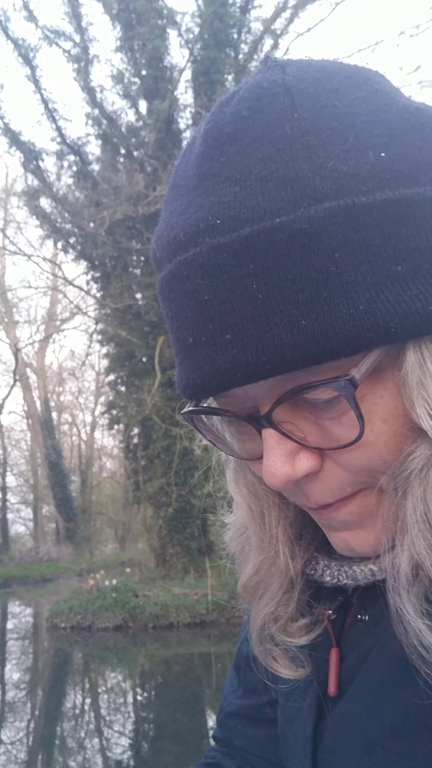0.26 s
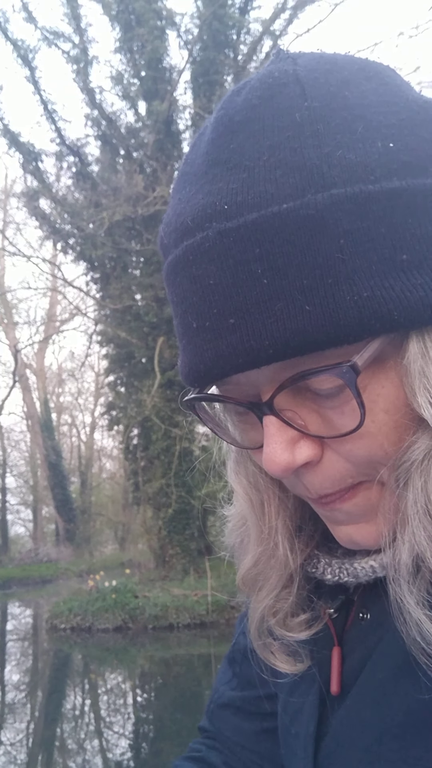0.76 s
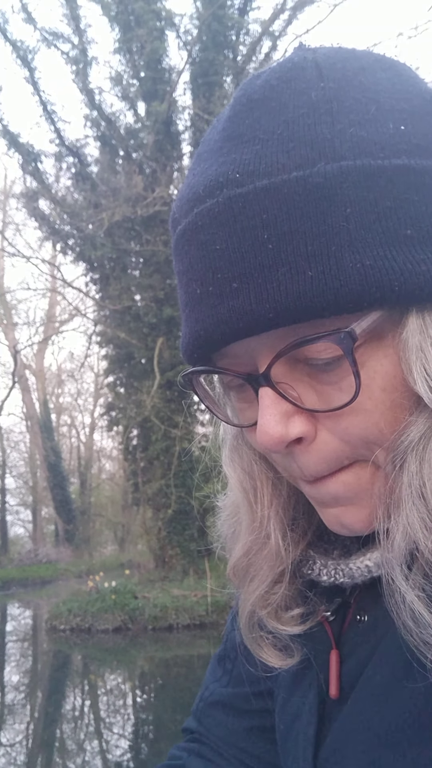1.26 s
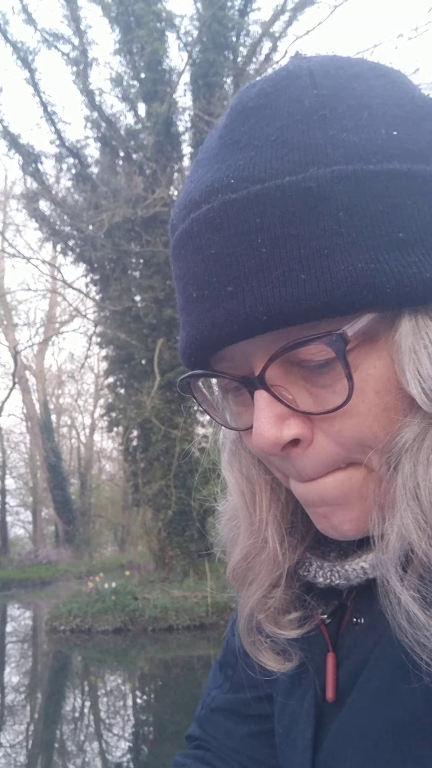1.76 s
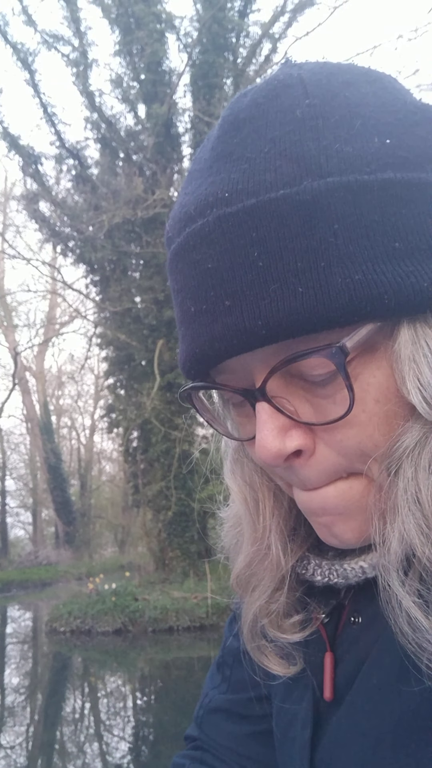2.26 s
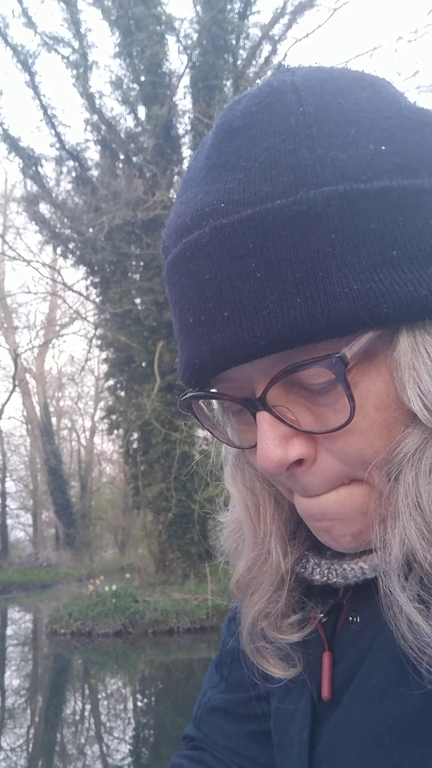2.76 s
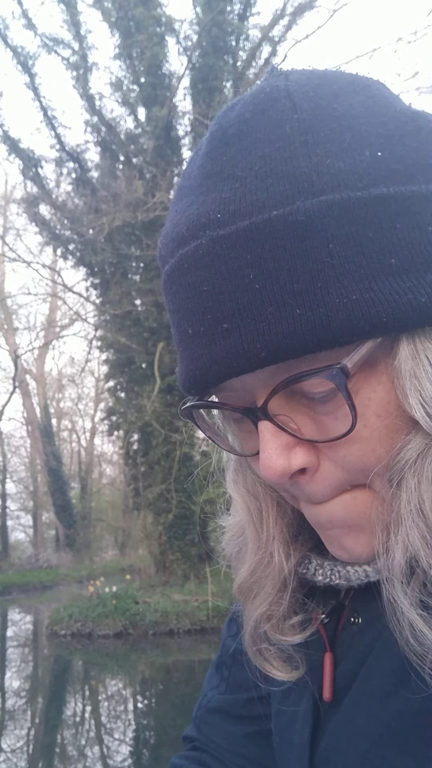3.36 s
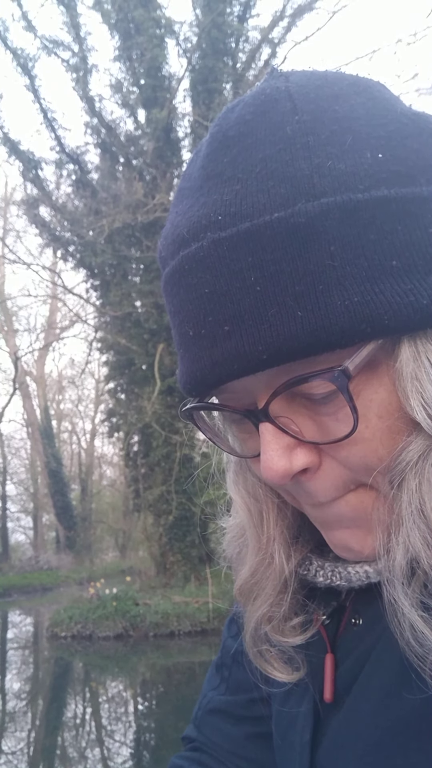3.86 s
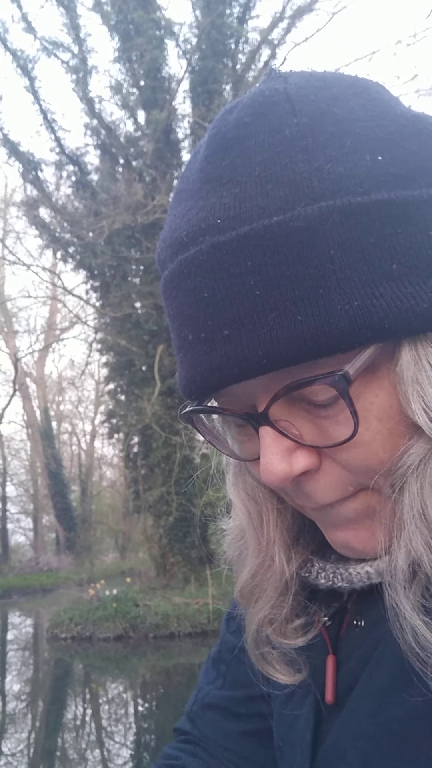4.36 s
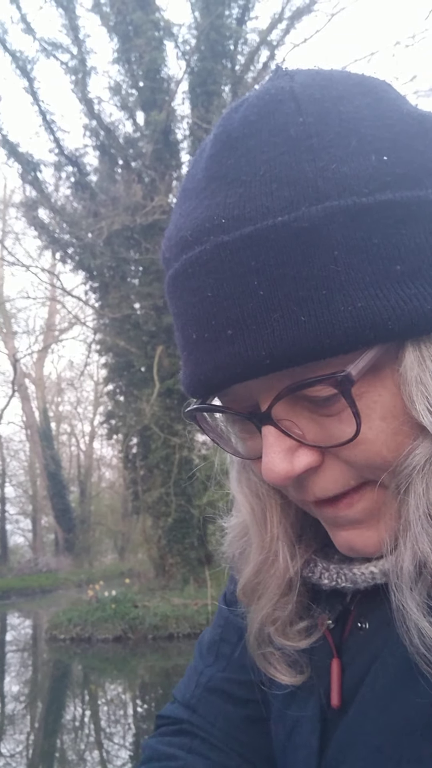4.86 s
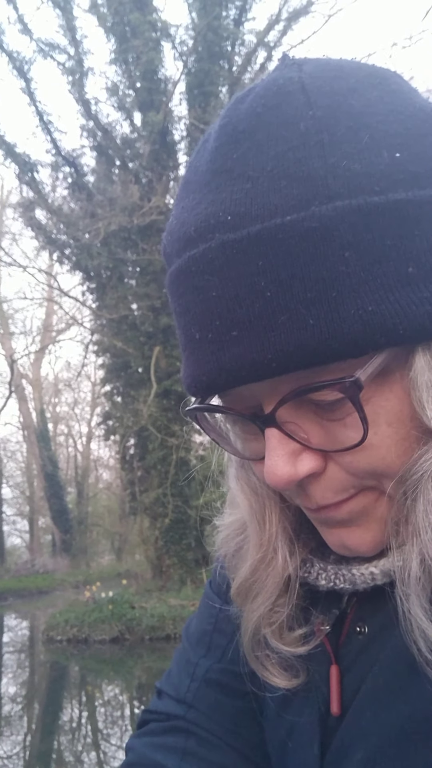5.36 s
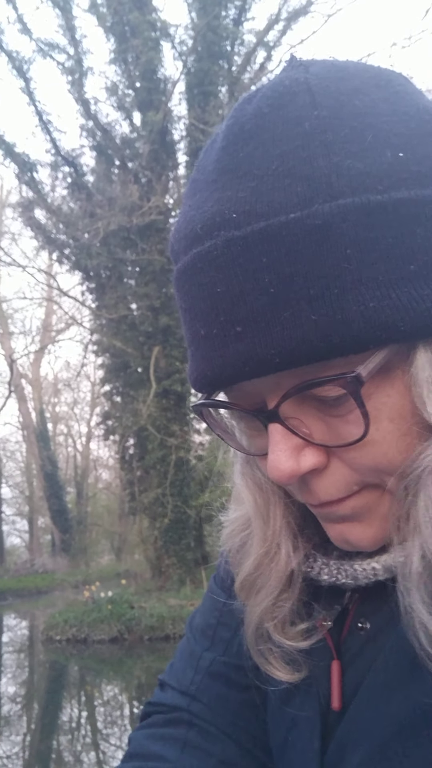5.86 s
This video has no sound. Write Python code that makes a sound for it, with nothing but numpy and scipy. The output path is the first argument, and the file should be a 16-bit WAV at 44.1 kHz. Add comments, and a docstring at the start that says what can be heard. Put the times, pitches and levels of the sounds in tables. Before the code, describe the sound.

Small birds sing throughout in a quiet wood at dawn, their notes echoing lightly among the trees. Behind them are a blurred chorus of far birds, a steady low rumble of distant traffic and a faint hiss. In the first second a far bird warbles while another gives quick ticking chirps, and a jacket sleeve brushes faintly. From about 1.2 seconds high thin chirps and falling notes join in, with a fine trill from 2.3 to 3.3 seconds. A nearer bird whistles short gliding phrases from about 2.5 seconds onward. The sleeve stirs softly again around 3.5 seconds. From 4.3 seconds to the end at about 6 seconds it rubs close to the hand-held microphone, louder than the birds, with crisp cloth snaps, the sharpest near 4.6 seconds and more near 5.1 and 5.9. A few soft low handling thumps fall between 4.6 and 5.2 seconds.

```python
"""Birds sing in a wood at dawn: a near whistler, a far warbler, a high singer, falling notes and ticks.
Each note is a gliding pure tone that echoes among the trees. Close to the hand-held recorder a jacket
sleeve rubs (many tiny slips of cloth) and snaps, and handling the recorder adds a few soft low thumps.
Behind it all are a blurred chorus of far birds and distant traffic. The recorder hisses faintly, and
its right port (microphone opening) is shaded from the treble."""
import sys
import numpy as np
from scipy import signal
from scipy.fft import rfft, irfft, next_fast_len
from scipy.io import wavfile
from scipy.ndimage import uniform_filter1d, map_coordinates

SR = 44100
rng = np.random.default_rng(int(sys.argv[2]) if len(sys.argv) > 2 else 0)


def pcm_store(signal):
    """Save signal as 16-bit PCM."""
    levels = np.round(np.clip(np.atleast_2d(signal), -1, 1) * 32767)
    wavfile.write(sys.argv[1], SR, levels.astype(np.int16).T)


N = 269451

# How alike far sounds are on the left and right: f/Hz, likeness (1 = the same, 0 = unrelated)
FAR_LIKENESS = [(30, 0.86), (60, 0.98), (150, 0.97), (380, 0.9), (950, 0.32), (2380, -0.3), (5980, 0.14),
                (15000, 0.079)]


def birds():
    """Each bird is heard from its own side and again as an echo; far birds are mostly echo."""
    # One note a row: t/s, length/s, first f/Hz, halfway f/Hz, last f/Hz, level/dB, growth/dB
    whistler_notes = [ (1.508, .05, 3600, 3250, 2400, -47, -9), (2.505, .075, 3300, 3780, 3850, -50, -2),
                      (2.835, .045, 2400, 2480, 2880, -48, 5), (2.885, .052, 2900, 3080, 2400, -45, -3),
                      (2.955, .078, 2880, 2770, 2740, -46, 3), (3.075, .08, 2800, 2520, 2270, -46, 6),
                      (3.61, .05, 2880, 2890, 2960, -52, -7), (3.69, .05, 3450, 4040, 3500, -47, 0),
                      (3.857, .03, 2980, 2880, 2830, -43, 9), (3.908, .012, 2550, 2350, 2150, -45, -3),
                      (4.085, .08, 2210, 2350, 2250, -43, 0), (4.7, .045, 2450, 2350, 2290, -49, 0),
                      (5.26, .04, 2700, 2950, 3250, -48, 0), (5.33, .09, 3990, 3960, 3950, -47, -3),
                      (5.43, .17, 3880, 3900, 3950, -52, 0), (5.3, .4, 4400, 4330, 4400, -51, -5),
                      (5.43, .05, 3050, 2600, 2500, -45, 6), (5.545, .035, 2480, 2650, 2900, -49, 0),
                      (5.82, .028, 3420, 3320, 3130, -43, 2), (5.872, .015, 3450, 3500, 3480, -47, 0), ]
    warbler_notes = [ (.075, .105, 3000, 2520, 2270, -53, 0), (.2, .12, 2280, 2200, 2250, -62, 0),
                     (.35, .085, 2290, 2290, 2280, -57, -3), (.48, .06, 2950, 2300, 2000, -55, 0),
                     (.55, .19, 2550, 2720, 2620, -53, -3), (.76, .1, 2940, 2950, 3000, -60, 0),
                     (.85, .07, 2820, 2600, 2280, -58, 0), (.95, .1, 2660, 2640, 2300, -59, 0),
                     (1.18, .12, 3320, 3330, 3310, -59, 0), (1.86, .54, 2570, 2580, 2600, -60, -11),
                     (5.96, .14, 3250, 3255, 3260, -57, -3), ]
    high_notes = [ (.195, .03, 5640, 5645, 5650, -54, 4), (.37, .06, 6500, 6550, 6600, -64, 0),
                  (.76, .04, 6370, 6360, 6350, -62, -8), (.92, .13, 5990, 5980, 5970, -59, -4),
                  (1.245, .095, 7150, 6540, 6340, -51, 4), (1.34, .11, 6340, 6450, 6950, -58, -4),
                  (1.469, .023, 6400, 5950, 4850, -43, -4), (1.5, .25, 8020, 7970, 7920, -74, 9),
                  (1.632, .018, 6250, 5700, 5050, -55, -2), (1.825, .125, 7440, 6600, 6370, -51, 11),
                  (1.97, .1, 6770, 6400, 6270, -49, 5), (2.065, .025, 6350, 5800, 4780, -44, 0),
                  (2.12, .07, 6670, 6380, 6250, -51, 2), (3.235, .02, 6400, 6400, 6400, -59, -4),
                  (2.78, .12, 7450, 7650, 8050, -68, 0), (2.29, .08, 7650, 7600, 7500, -66, 0),
                  (2.385, .05, 7000, 6100, 5100, -52, -3), (2.65, .02, 6530, 5700, 4880, -59, 10),
                  (3.11, .14, 7450, 7520, 7960, -67, -5), (3.47, .08, 6440, 6240, 5700, -52, -5),
                  (3.57, .13, 7600, 7510, 7420, -67, 10), (4.17, .05, 6860, 6600, 6340, -56, 6),
                  (4.4, .04, 6500, 6515, 6530, -51, 6), (4.5, .06, 6630, 6400, 6180, -54, 0),
                  (4.67, .05, 7070, 6730, 6530, -54, 8), ]
    trill_notes = [(1.66, .07, 5680, 5780, 5800, -56, -2), (2.27, 1.07, 4870, 4740, 4690, -54.5, 0)]
    # Straight glides: t/s, length/s, first f/Hz, last f/Hz, level/dB
    falling_notes = [(0.232, 0.015, 4900, 3300, -57), (0.89, 0.02, 4240, 3330, -54),
                     (1.13, 0.02, 4320, 3740, -52), (1.21, 0.02, 4120, 3100, -54),
                     (1.34, 0.05, 4670, 3050, -57), (1.56, 0.08, 5200, 2970, -55),
                     (1.793, 0.08, 5300, 3100, -52), (2.026, 0.075, 5200, 3070, -53),
                     (2.244, 0.085, 5500, 3050, -52), (2.496, 0.062, 4900, 2950, -52),
                     (3.246, 0.013, 5370, 4290, -43), (3.83, .015, 4700, 3900, -55),
                     (3.86, .015, 4500, 4100, -55), (3.495, .012, 4000, 3500, -54),
                     (3.305, 0.016, 4300, 3300, -46), (3.76, .015, 4300, 3900, -52),
                     (4.04, 0.02, 4120, 4200, -53), (4.32, 0.03, 4360, 3530, -48)]
    glides = [(start, length_s, first_hz, (first_hz + last_hz) / 2, last_hz, db, 0)
              for start, length_s, first_hz, last_hz, db in falling_notes]
    whistler = sing(whistler_notes, edge_s=.005, flutter_db=2.5, waver=.008)
    warbler = sing(warbler_notes, edge_s=.012, flutter_db=2.5, waver=.018, pulse_hz=46, depth=.5)
    high = sing(high_notes, edge_s=.006, flutter_db=2, waver=.006)
    high += sing(trill_notes, edge_s=.01, flutter_db=2.5, waver=.01, pulse_hz=52, depth=.5)
    falling = sing(glides, edge_s=.008, flutter_db=2, waver=.012)
    crowd = sing(chatter(count=200, level_db=-61), edge_s=.008, flutter_db=1.5, waver=.012)
    ticks = ticking_bird(rise_hz=726, top_hz=5470, half_length_s=0.0047)
    # song, direct gain/dB, extra gain on the right/dB, delay on the right/s, echo gain/dB
    singers = [(whistler, 1.5, .8, -.00014, -9), (ticks, 5.5, -4, .0005, -6),
               (warbler, -4, 1.5, -.00014, 0), (high, -.6, 1.5, .0003, -4),
               (falling, -5.5, 3.5, -.0002, -2.5), (crowd, -6, 2.5, -.0001, 1.5)]
    direct = sum(amp(db) * ports(song, right_db, lag_s) for song, db, right_db, lag_s, _ in singers)
    into_trees = sum(amp(echo_db) * song for song, *_, echo_db in singers)
    nearest_branches = amp(-1.5) * tree_echo(into_trees, fade_s=.12, count=2)
    return direct + nearest_branches + tree_echo(into_trees, fade_s=1.0, count=4)


def sing(notes, edge_s, flutter_db, waver, pulse_hz=0, depth=0):
    """Each note is a wavering tone that glides through three pitches; a warble also throbs unevenly."""
    song = np.zeros(N)
    flutter = amp(flutter_db * wobble(100))
    drift = 1 + waver * wobble(220)
    throb_hz = pulse_hz * (1 + 0.21 * wobble(9.7))
    throb = 1 + depth * tone(throb_hz)
    for start, length_s, first_hz, half_hz, last_hz, db, growth_db in notes:
        begin, end = round((start - edge_s) * SR), round((start + length_s + edge_s) * SR)
        at = np.arange(max(begin, 0), min(end, N))
        fade = np.clip(np.minimum(at - at[0], at[-1] - at) / (2 * edge_s * SR), 0, 1)
        way = np.clip(2 * (at / SR - start) / length_s - 1, -1, 1)  # -1 at the start, 1 at the end
        bend_hz = (first_hz + last_hz) / 2 - half_hz
        pitch = half_hz + way * (last_hz - first_hz) / 2 + way ** 2 * bend_hz
        level_db = db + growth_db * way / 2 + 0.5 * way ** 2  # both ends are lifted a little
        song[at] += np.sqrt(2) * amp(level_db) * fade * tone(pitch * drift[at])
    return song * flutter * throb


def ticking_bird(rise_hz, top_hz, half_length_s):
    """Short rising chirps, each at a slightly different pitch."""
    # One chirp a row: t/s, peak level/dB
    chirps = [(0.022, -51), (0.1381, -54), (0.2937, -55), (0.412, -51), (0.5252, -51), (0.6769, -50),
              (0.8535, -49), (0.9807, -49), (1.1278, -50), (1.2755, -48), (1.9445, -47), (2.1844, -49),
              (2.3521, -49), (2.376, -48), (2.4494, -51), (2.5521, -49), (2.6175, -49), (2.6609, -48),
              (2.7801, -50), (2.8904, -49), (3.0006, -52), (3.2974, -49), (2.7167, -47), (2.8414, -48),
              (2.9746, -46), (3.1218, -49), (3.5828, -47), (4.0257, -45)]
    song, t = np.zeros(N + SR), np.arange(SR // 20) / SR
    pitch = top_hz - rise_hz * np.exp(-t / half_length_s)
    swell = np.sin(np.pi * np.clip(t / (2 * half_length_s), 0, 1))
    for start, db in chirps:
        detune = 1 + 0.021 * rng.standard_normal()
        song[round(start * SR):][:len(t)] += amp(db) * swell * tone(pitch * detune)
    return song[:N]


def chatter(count, level_db):
    """Notes for many small birds far off: short downward glides at random times."""
    when, pitch, softness, length, ending = rng.random((count, 5)).T
    first_hz = 3000 + 3600 * pitch
    last_hz = first_hz * (.7 + .17 * ending)
    return np.transpose([when * N / SR, .015 + .035 * length, first_hz, (first_hz + last_hz) / 2,
                         last_hz, level_db - 9 * softness, np.zeros(count)])


def tree_echo(sound, fade_s, count):
    """Trunks and stream banks scatter sound into noisy tails that change as the air moves."""
    t = np.arange(SR) / SR
    tails = rng.standard_normal((count, 2, len(t))) * amp(-60 * t / fade_s)
    shares = np.array([wobble(22) for _ in range(count)]) / np.sqrt(count)
    echo = sum(signal.fftconvolve((sound * share)[None], tail, axes=1)[:, :N]
               for share, tail in zip(shares, tails))
    return echo / np.linalg.norm(tails[0, 0])


def sleeve():
    """The sleeve rubs and snaps; the right port hears the treble from another part of the cloth."""
    # The hand hides the cloth from the right port: f/Hz, gain/dB
    hand_shade = [(2000, 1), (5500, -10.5), (12000, 2.5)]
    grain = amp(2.5 * wobble(1200) + 1.2 * wobble(40))  # the slips come in clumps
    near, far = cloth_rubbing(grain)
    bursts = snaps_and_thumps(grain)
    far_share = lambda hz: np.sqrt(1 / (1 + (3000 / (hz + 1)) ** 4))
    right_rub = filtered(far, far_share) + filtered(near, lambda hz: np.sqrt(1 - far_share(hz) ** 2))
    right_rub = filtered(right_rub, lambda hz: amp(along(hand_shade, hz)))
    dull_bursts = filtered(bursts, lambda hz: 1 / (1 + 1j * hz / 2500))
    right = ports(right_rub + dull_bursts, right_db=2.0, lag_s=0.00053)[1]
    return np.array([near + bursts, right])


def cloth_rubbing(grain, low_hz=2500, fizz_hz=8000):
    """Weave slides on weave in tiny slips at two parts of the arm: a high fizz over a lower rasp."""
    # Tone colour of the rubbing as the microphone hears it, with low handling rumble: f/Hz, level/dB
    heard_spectrum = [(180, -26), (320, -22), (620, -24.5), (1060, -8.5), (1240, -14), (1460, -6),
                      (1770, -5), (3080, 2), (3380, 0), (5820, 1.5), (8280, -13.5), (12000, -13),
                      (15100, -3), (16000, -14.5)]
    # Boost of the rubbing below low_hz: t/s, gain/dB
    low_boost = [(1, 5.5), (3.5, 2.5), (4.2, 10), (4.4, 4), (4.6, 0), (4.8, 4.5), (4.95, 3.5), (5.1, 1),
                 (5.25, 0.5), (5.45, -1), (5.6, -1.5), (5.75, 1.5), (5.95, -1)]
    # One list for each stroke of the arm: t/s, level/dB, extra rasp gain/dB
    strokes = [
        [(0.48, -81, -3), (0.6, -62, -6.5), (0.91, -54, -7.5), (1.07, -57, -9), (1.22, -68.5, -1),
         (1.3, -79, 7), (1.43, -65.5, -8), (1.52, -81, 6)],
        [(3.18, -87, -4), (3.28, -67, -8), (3.4, -57, 0.5), (3.49, -59, -1), (3.55, -62.5, -2.5),
         (3.69, -61.5, 5.5), (3.78, -70.5, 7.5), (3.84, -68, -1), (3.94, -81, -5)],
        [(4.13, -76, -1), (4.18, -63.5, -0.5), (4.27, -58.5, -1.5), (4.37, -43.5, -2.5), (4.47, -50, 0.5),
         (4.54, -43.5, -0.5), (4.68, -48.5, 1.5), (4.76, -41.5, -1.5), (4.85, -46.5, -1.5), (4.9, -44, 0.5),
         (5.05, -48.5, 2.5), (5.11, -44.5, 0), (5.16, -47, 4), (5.35, -49, 4.5), (5.5, -46.5, 0),
         (5.66, -43, -3.5), (5.73, -47.5, 1), (5.79, -40, -4.5), (5.86, -54, 2.5), (5.91, -49.5, 0),
         (5.99, -65.5, 9), (6.09, -67.5, 6.5)],
    ]
    slips = grain * stereo_noise(patchy_db=1.5)
    slips = filtered(slips, lambda hz: amp(along(heard_spectrum, hz)))
    low = filtered(slips, lambda hz: 1 / (1 + (hz / low_hz) ** 6))
    low_db, = curves(low_boost)
    slips += (amp(low_db) - 1) * low
    fizz = filtered(slips, lambda hz: 1 / (1 + (fizz_hz / (hz + 1)) ** 8))
    rasp = slips - fizz
    rub, t = np.zeros((2, N)), np.arange(N) / SR
    for stroke in strokes:
        level_db, rasp_db = curves(stroke)
        moving = (t > stroke[0][0]) & (t < stroke[-1][0])
        rub += moving * amp(level_db) * (fizz + amp(rasp_db) * rasp) / np.std(fizz)
    return rub


def snaps_and_thumps(grain):
    """Cloth snaps, plus a few soft low thumps from handling the recorder: short bursts of noise."""
    # Rows below 500 Hz are the thumps: peak t/s, peak level/dB, lowest f/Hz, highest f/Hz, length/s
    bursts = [(1.519, -42.5, 800, 1410, 0.004), (4.356, -32, 2900, 7000, 0.006),
              (4.55, -39, 2500, 6900, 0.002), (4.5774, -5.5, 1300, 7000, 0.00006),
              (4.5778, -15.5, 1500, 2300, 0.00012), (4.581, -19.5, 1200, 5400, 0.0036),
              (4.583, -32, 304, 1260, 0.0056), (4.5863, -20, 890, 3970, 0.0015),
              (4.655, -21.5, 1380, 6900, 0.0032), (4.654, -24, 10700, 16100, 0.00091),
              (4.781, -19.5, 3200, 5260, 0.0056), (4.778, -58, 179, 415, 0.021),
              (4.998, -48.5, 150, 445, 0.029), (5.172, -51, 202, 470, 0.08),
              (4.893, -32, 1490, 6900, 0.0061), (4.956, -27, 2720, 3700, 0.025),
              (5.12, -23.5, 1470, 5530, 0.009), (5.104, -25.5, 1400, 4200, 0.0066),
              (5.218, -28.5, 3500, 6300, 0.0033), (5.932, -24.5, 1210, 6630, 0.011),
              (5.938, -21, 3520, 7200, 0.0095), (5.935, -33, 9900, 16000, 0.0088)]
    sound, t = np.zeros(N + SR), np.arange(-SR // 20, SR // 20) / SR
    steepness = np.where(t < 0, 1.5, .75)  # rises twice as fast as it fades
    for peak_s, db, low_hz, high_hz, length_s in bursts:
        # the shortest snaps are a single push
        push = rng.standard_normal(len(t)) * grain[:len(t)] if length_s > .0008 else 1
        burst = np.exp(-(steepness * t / length_s) ** 2) * push
        band = signal.butter(2, [low_hz, high_hz], btype="band", fs=SR, output="sos")
        burst = signal.sosfiltfilt(band, burst)
        sound[round(peak_s * SR) - SR // 20:][:len(t)] += amp(db) * burst / np.abs(burst).max()
    return sound[:N]


def traffic():
    """Distant traffic: a low rumble and the roar of tyres."""
    # How loud the road is: t/s, rumble level/dB, roar level/dB
    road_levels = [(0.0, -50.5, -61.5), (1.9, -52, -59.5), (2.8, -51.5, -57.5), (4.2, -51.5, -57.5)]
    # Tone colours of the rumble and the roar: f/Hz, level/dB
    rumble_spectrum = [(18, -40), (30, -38), (50, -6.5), (75, 1), (189, -15.5), (259, -17.5), (400, -30),
                       (520, -81), (880, -120)]
    roar_spectrum = [(220, -68), (380, -12), (496, -1.5), (565, -5), (824, -1.5), (1800, -10), (2340, -39),
                     (3960, -120)]
    rumble_db, roar_db = curves(road_levels)
    rumble_gain = amp(rumble_db - 1.0 + 0.2 * wobble(4.7))
    rumble = rumble_gain * stereo_noise(rumble_spectrum, FAR_LIKENESS, patchy_db=1.0)
    roar = amp(roar_db - 2.0) * stereo_noise(roar_spectrum, FAR_LIKENESS, patchy_db=1.08)
    return rumble + roar


def far_chorus():
    """Far birds melt together into a patchy, high noise."""
    # How loud the chorus is: t/s, level/dB
    chorus_levels = [(0.0, -63), (2.31, -57.5), (4.1, -63)]
    # Its tone colour: f/Hz, level/dB
    chorus_spectrum = [(940, -70), (1600, -5), (2830, 0.5), (3040, -0.5), (4100, -5.5), (5140, 1),
                       (6260, -7), (7400, -13), (9620, -74), (16300, -120)]
    level_db, = curves(chorus_levels)
    return amp(level_db + 4.5) * stereo_noise(chorus_spectrum, FAR_LIKENESS, patchy_db=3.5)


def stereo_noise(spectrum=((1000, 0),), likeness=((1000, 0),), patchy_db=0):
    """Noise with random louder and softer patches; by default white, with unrelated left and right."""
    cells = signal.stft(rng.standard_normal((2, N)), nperseg=512)[2]
    patches = uniform_filter1d(rng.standard_normal(cells.shape[1:]), size=5, axis=0)  # blur over pitch
    patches = uniform_filter1d(patches, size=8, axis=1)  # blur over time
    pair = signal.istft(cells * amp(patchy_db * unit(patches)), nperseg=512)[1][:, :N]
    spread = lambda hz: np.arccos(np.clip(along(likeness, hz), -1, 1)) / 2
    shares = lambda hz: [np.cos(spread(hz)), np.sin(spread(hz))]
    mid, side = filtered(pair, lambda hz: amp(along(spectrum, hz)) * shares(hz))
    return unit(np.array([mid + side, mid - side]))


def ports(sound, right_db, lag_s):
    """One sound at both ports: the right gets it at another level, later (earlier if lag_s < 0)."""
    right = lambda hz: amp(right_db) * np.exp(-2j * np.pi * hz * lag_s)
    return filtered(np.array([sound, sound]), lambda hz: np.array([np.ones_like(hz), right(hz)]))


def filtered(sound, response):
    """Multiply each frequency in the sound by response(hz)."""
    size = next_fast_len(N + SR // 2)
    return irfft(rfft(sound, size) * response(np.fft.rfftfreq(size, 1 / SR)), size)[..., :N]


def tone(hz):
    """A sine wave that follows a changing frequency."""
    return np.sin(2 * np.pi * np.cumsum(hz) / SR)


def wobble(rate):
    """A smooth curve through rate random values a second."""
    return map_coordinates(rng.standard_normal(int(N * rate / SR) + 4), [np.arange(N) * rate / SR])


def curves(rows):
    """Turn each column after the time into one value per sample."""
    times, *columns = np.transpose(rows)
    return [np.interp(np.arange(N) / SR, times, column) for column in columns]


def along(points, hz):
    """Read between (f/Hz, value) points on a log frequency axis."""
    freqs, values = np.transpose(points)
    return np.interp(np.log(hz + 1), np.log(freqs + 1), values)


def amp(db):
    """Turn decibels into a gain."""
    return 10 ** (np.asarray(db) / 20)


def unit(x):
    """Scale to an average strength (rms) of 1."""
    return x / np.sqrt(np.mean(x ** 2) + 1e-20)


def scene():
    """Everything that reaches the two ports."""
    return birds() + traffic() + far_chorus() + sleeve()


def record(dry):
    """The right port loses treble, the electronics hiss, and nothing above 16 kHz passes."""
    # Shading of the right port: f/Hz, gain/dB
    right_shade = [(300, 0.5), (1300, -0.5), (2400, -5), (4400, -10), (8000, -19), (15000, -16)]
    # The recorder's own noise: f/Hz, level/dB
    hiss_spectrum = [(3000, -26), (7500, -15), (10000, -9), (15500, 0.5)]
    shaded = filtered(dry, lambda hz: np.array([np.ones_like(hz), amp(along(right_shade, hz))]))
    hiss = amp(-66.5) * stereo_noise(hiss_spectrum, patchy_db=3.5)
    return filtered(shaded + hiss, lambda hz: hz < 16000)


dry = scene()
out = record(dry)
pcm_store(out)
```